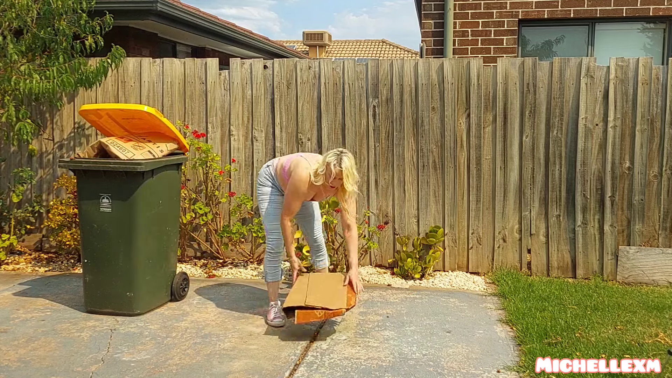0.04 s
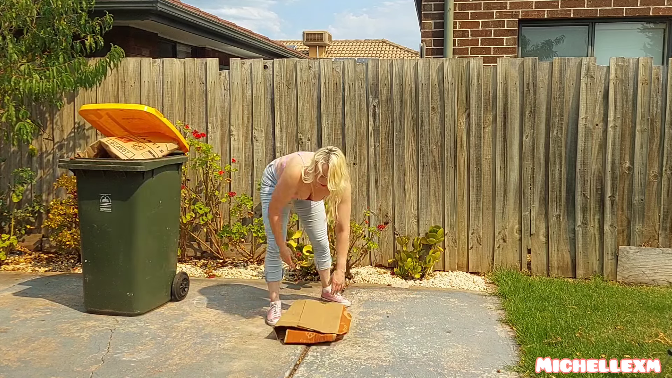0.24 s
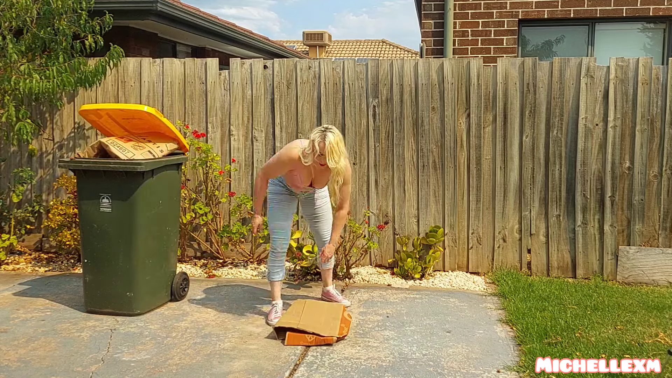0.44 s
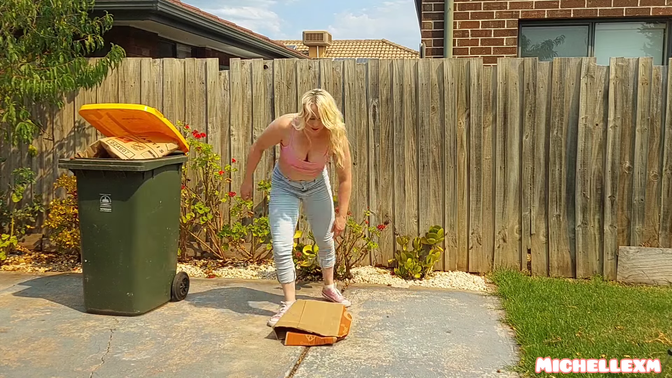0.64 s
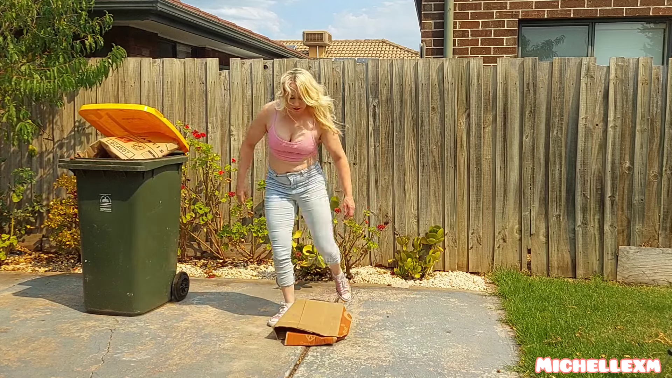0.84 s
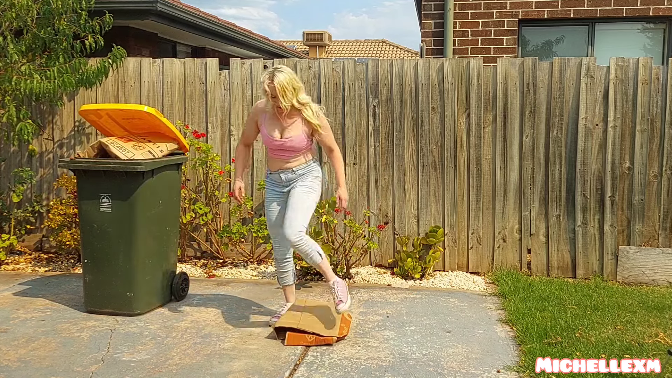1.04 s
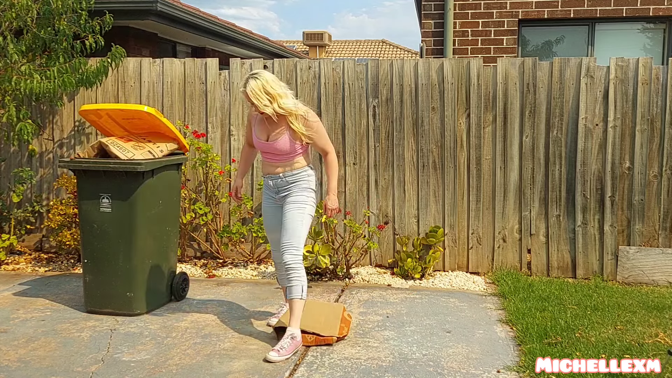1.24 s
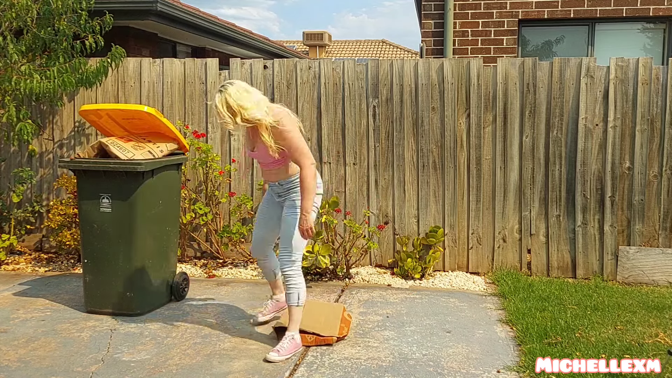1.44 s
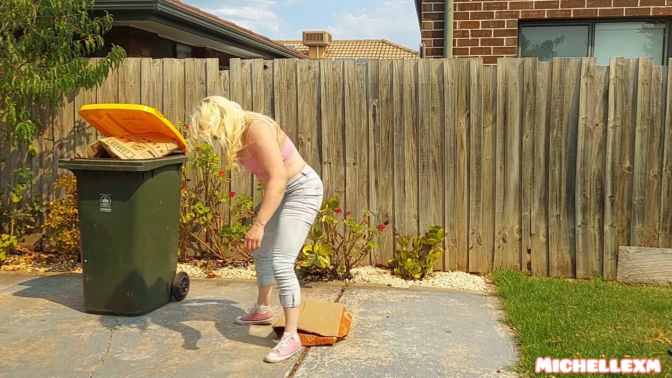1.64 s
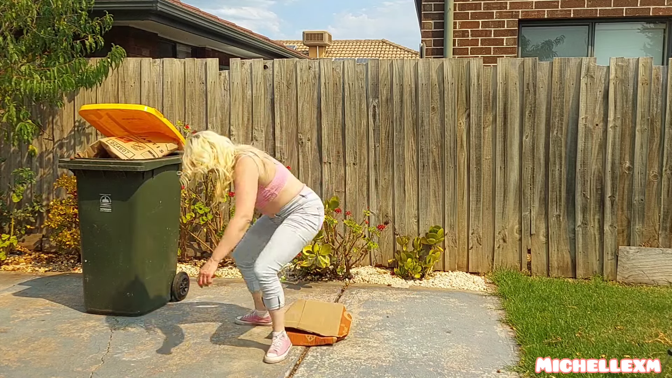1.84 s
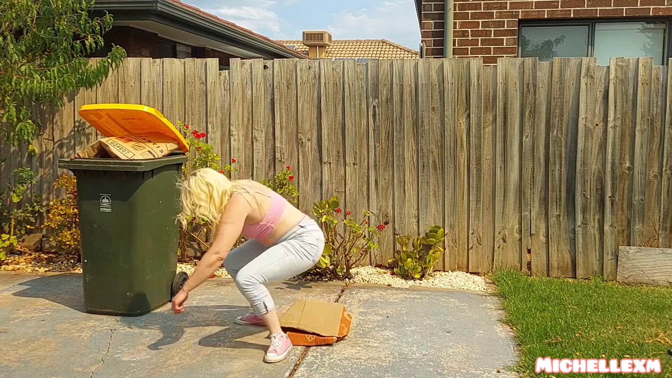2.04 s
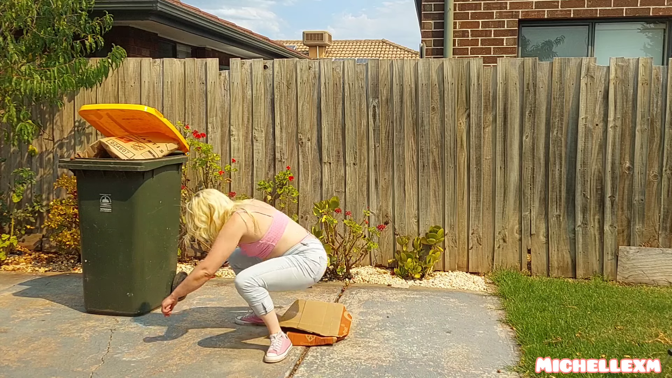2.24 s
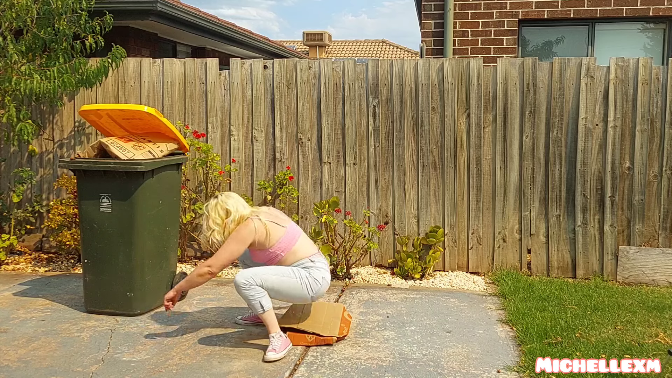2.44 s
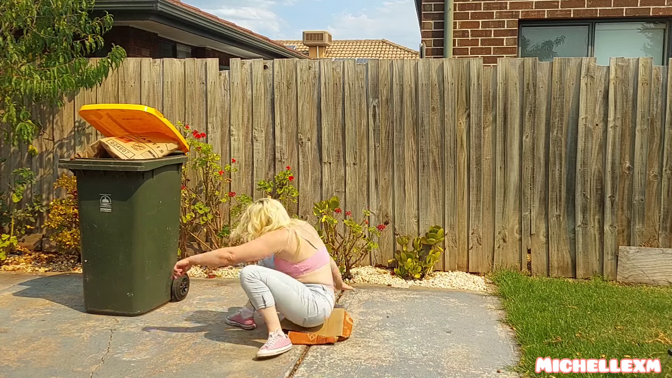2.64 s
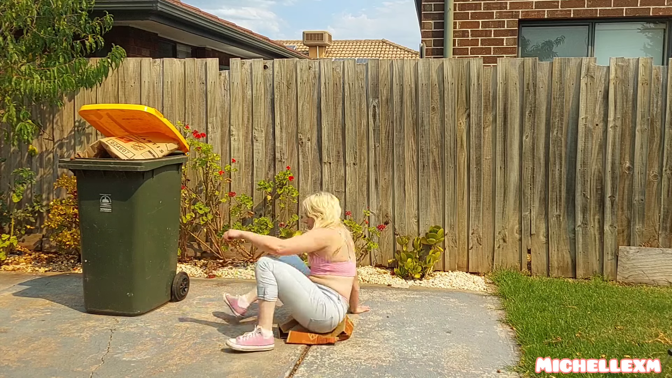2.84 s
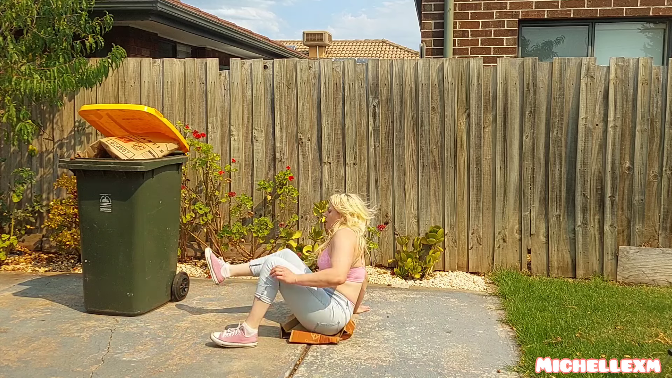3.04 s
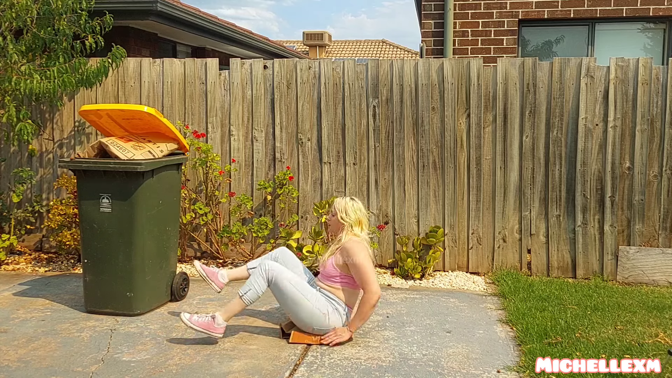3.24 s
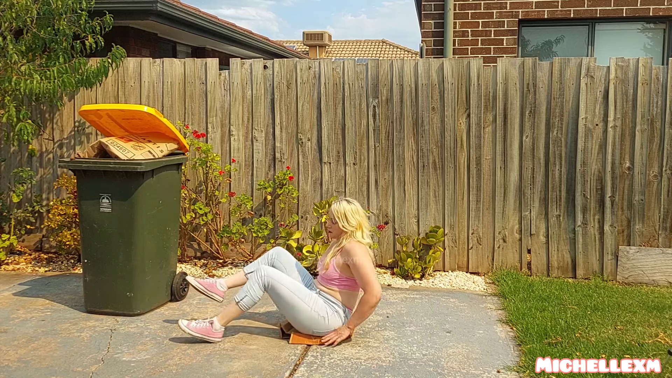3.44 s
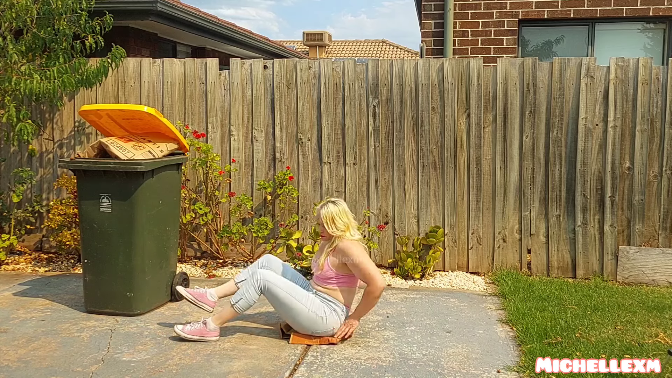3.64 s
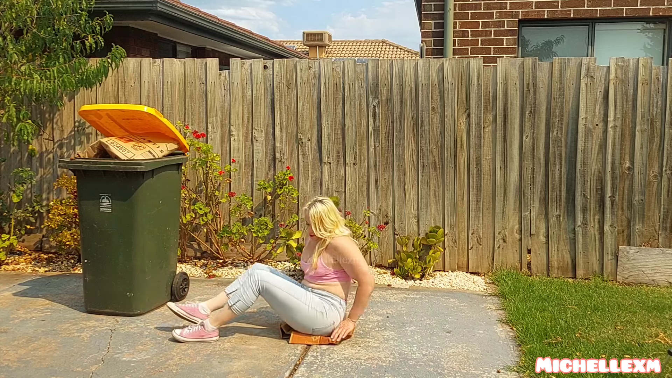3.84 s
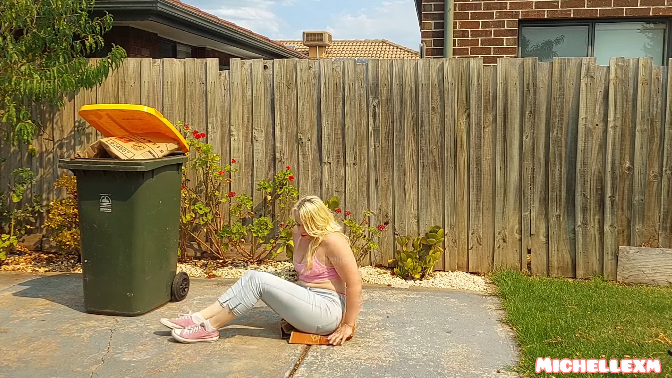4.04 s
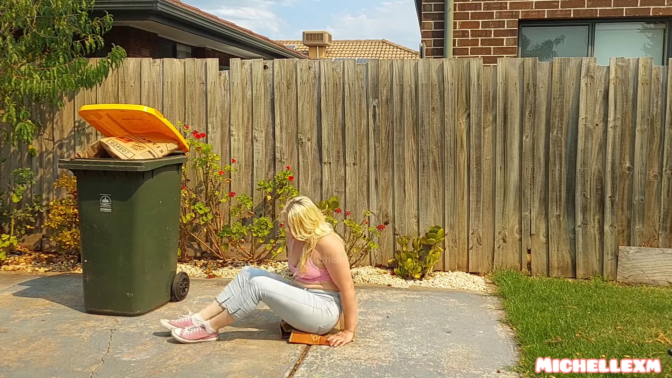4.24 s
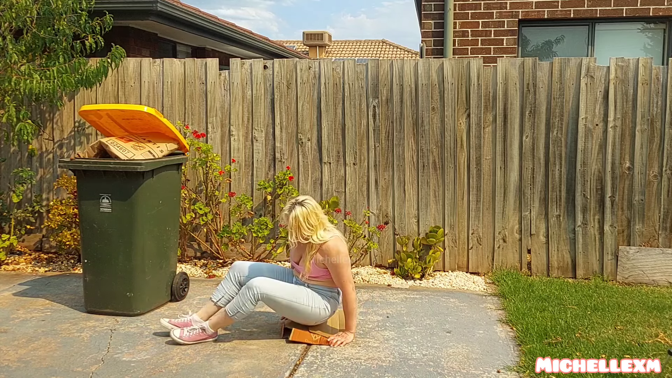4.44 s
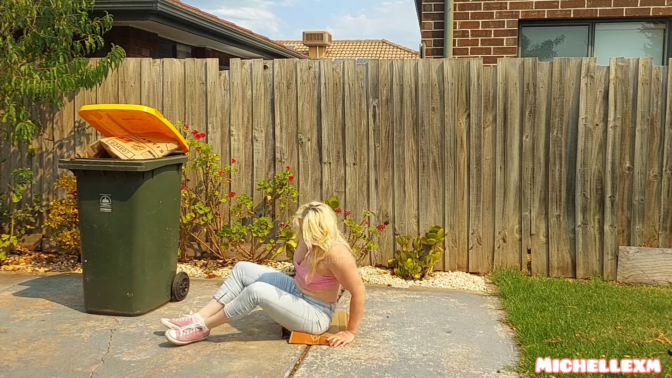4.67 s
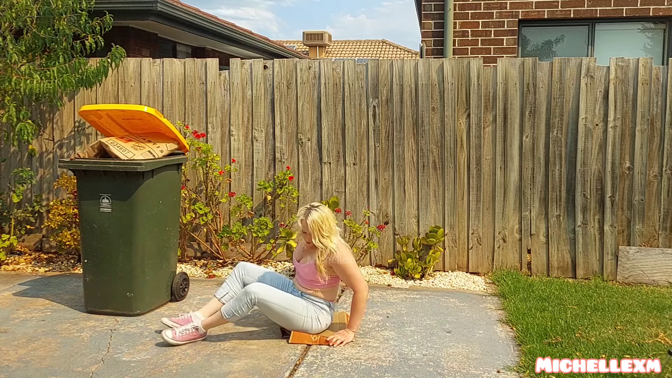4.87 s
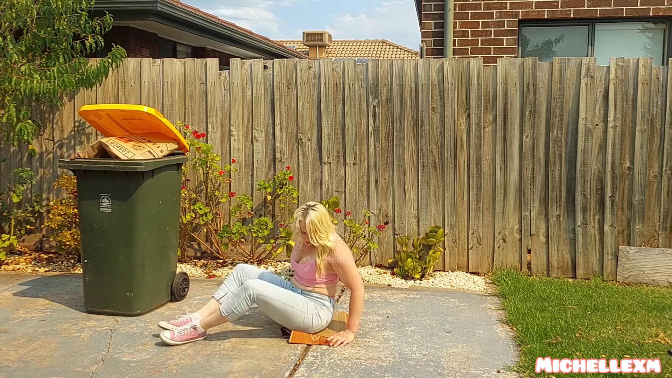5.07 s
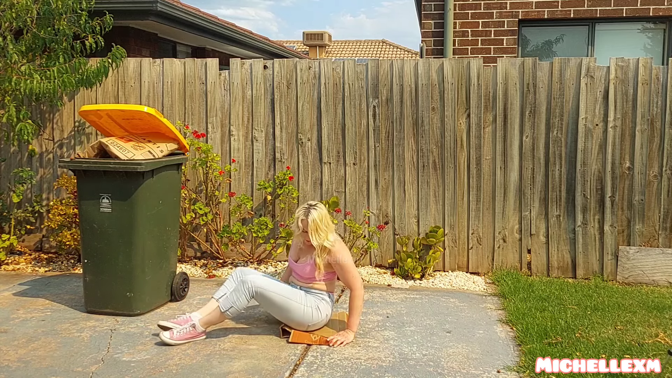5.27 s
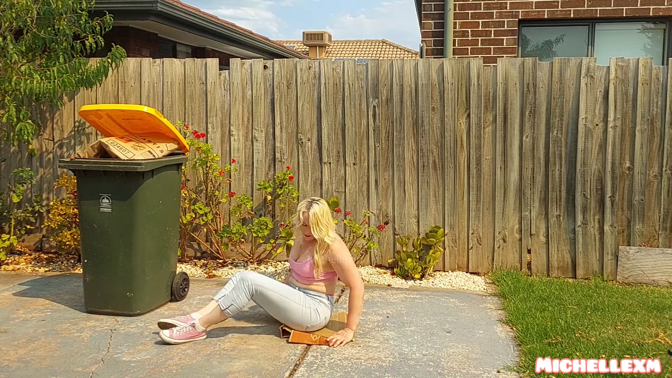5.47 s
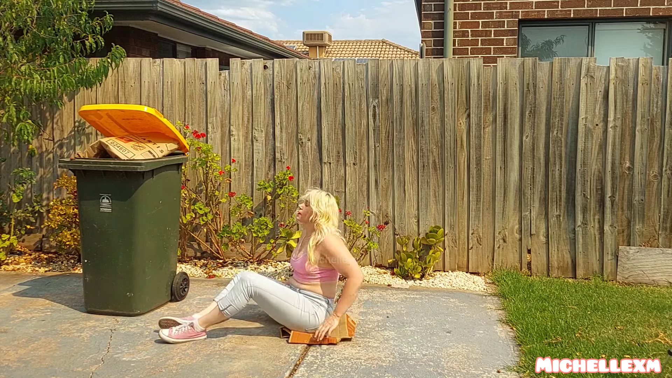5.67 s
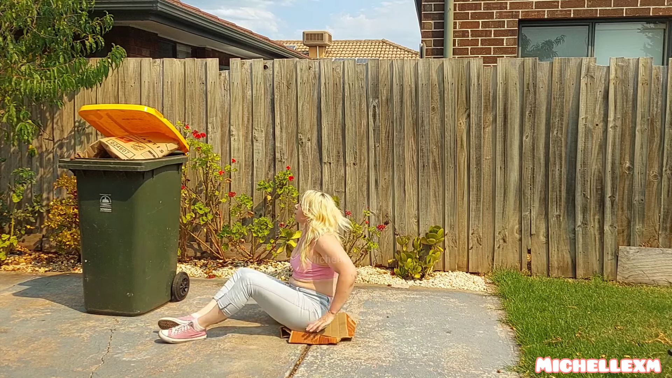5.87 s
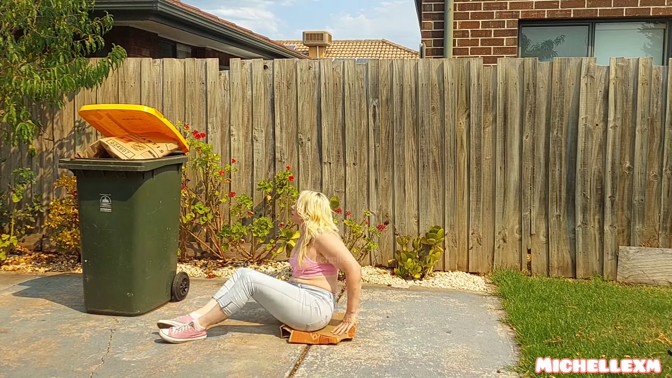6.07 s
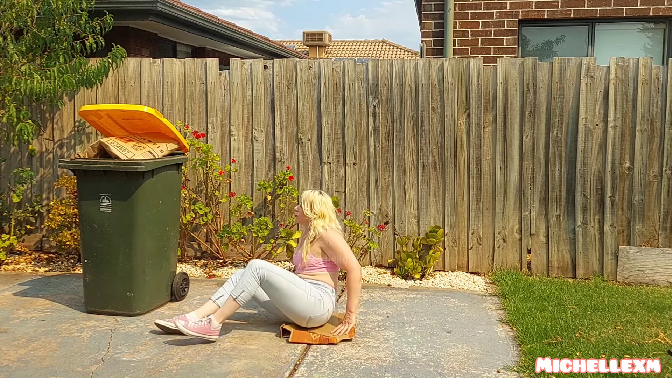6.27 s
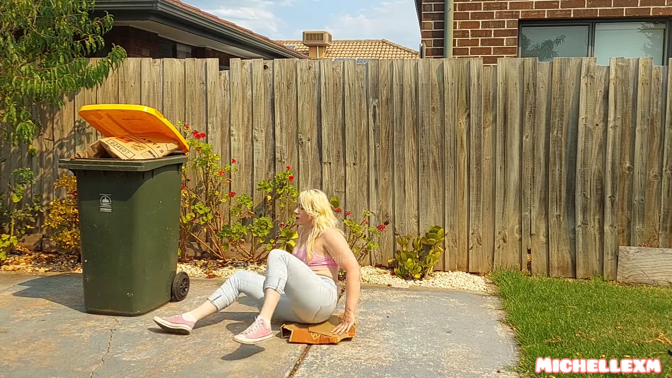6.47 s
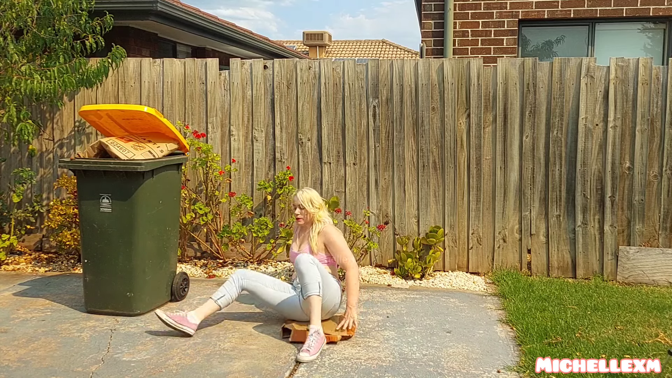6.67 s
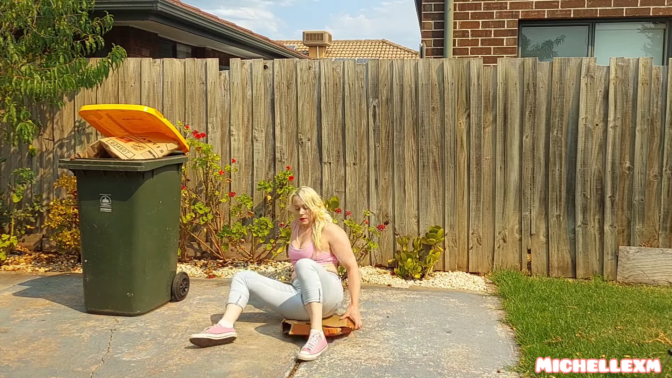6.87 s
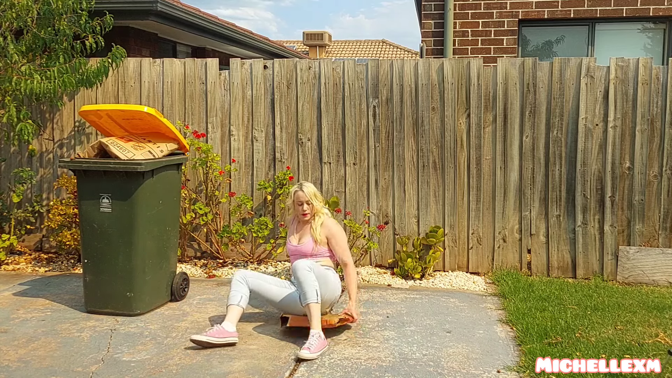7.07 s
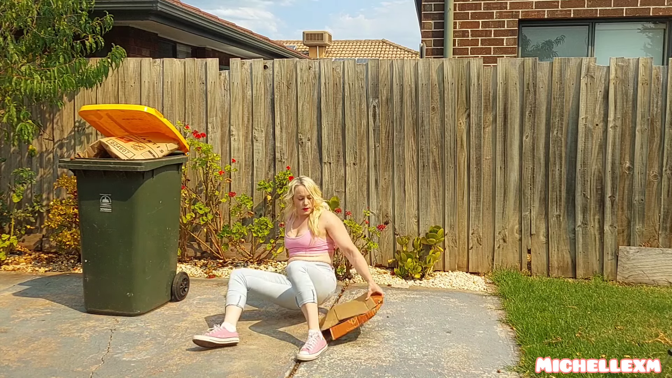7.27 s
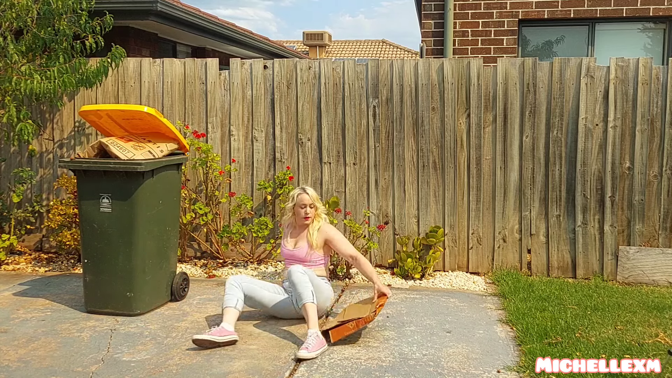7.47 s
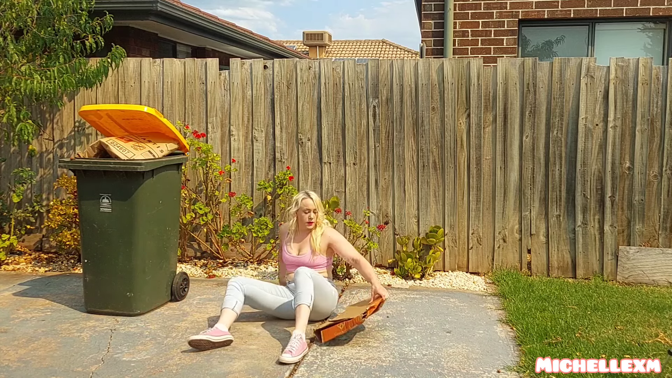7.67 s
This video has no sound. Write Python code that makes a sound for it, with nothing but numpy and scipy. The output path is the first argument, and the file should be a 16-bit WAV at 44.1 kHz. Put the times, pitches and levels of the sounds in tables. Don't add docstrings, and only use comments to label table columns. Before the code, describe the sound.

A cardboard box smacks onto concrete, then creaks, snaps and thumps hollowly as someone sits and shuffles on it, over a faint distant machine rumble.

```python
import sys
import numpy as np
from scipy import signal
from scipy.fft import rfft, irfft
from scipy.io import wavfile
from scipy.ndimage import uniform_filter1d

SR = 44100
rng = np.random.default_rng(int(sys.argv[2]) if len(sys.argv) > 2 else 0)


def put_to_file(sound):
    columns = np.atleast_2d(sound).T
    safe = np.clip(columns, -1, 1)
    whole_steps = np.round(safe * 32767)
    wavfile.write(sys.argv[1], SR, whole_steps.astype(np.int16))


def to_linear_factor(level_db):
    exponent = np.asarray(level_db, float) / 20
    return 10 ** exponent


N = 340011

# (frequency [Hz], density [dB per Hz])
RUSTLE = [(5000, -30), (7500, -15), (9200, -18), (10200, -4), (11400, 0), (13000, -2.5), (15000, -7),
          (16500, -10)]
# (frequency [Hz], density [dB per Hz])
GRIT = [(1800, -25.5), (3000, -5), (3900, -5), (5100, -5), (5800, -10.5), (8000, -10), (10000, -18.5)]


def cracks():
    # (time [s], snap peak [dB], thump re snap [dB], fizz re snap [dB], snap ring [Hz])
    creases = [(0.161, -34, -4, -10, 700), (0.2031, -23.5, 8, 9, 1100), (0.214, -31.5, 16, -14, 1180),
               (0.2247, -11.5, -14, 2, 1050), (0.2352, -26, 11.5, -43, 1040), (2.6337, -36, 12, -15, 902),
               (2.643, -21, 3, -17, 1390), (2.6974, -43, -15, -15, 1380), (2.7341, -34, -3, -29, 1300),
               (2.9347, -45, -29, 17, 1210), (4.3475, -26.5, 6, -25, 1010), (4.3573, -30.5, 4, -13, 1100),
               (4.6998, -37, -4, -7, 902), (4.732, -20.5, 0, 12, 1210), (4.7466, -19, -17, -30, 1700),
               (6.706, -33.5, -2, -17, 2420), (7.295, -29.5, -3, -20.5, 990)]
    # (time [s], snap peak [dB], fizz re snap [dB], snap ring [Hz])
    fibres = [(0.5494, -85, -24, 2560), (1.8093, -47, 12, 2570), (1.8577, -51, 16, 2510),
              (3.409, -43, -15, 1800), (3.893, -40, -24, 4440), (4.14, -40, -8, 2500),
              (4.1935, -27.5, 11.5, 2870), (4.246, -53, 1, 3400), (4.4393, -64, 30, 2630),
              (4.995, -67, 28, 3000), (5.153, -64, 24, 3000), (5.5013, -44.5, 17, 3200),
              (5.5892, -39, 9, 4500), (6.0447, -62, 1, 2660), (7.0477, -36, -30, 1530),
              (7.147, -56, -10, 1910)]
    crease_t60_s, fibre_t60_s, fibre_thump_db = 0.044, 0.014, -12
    events = [(*row, crease_t60_s) for row in creases]
    events += [(s, db, fibre_thump_db, fizz_db, hz, fibre_t60_s) for s, db, fizz_db, hz in fibres]
    t, out = np.arange(4410) / SR, np.zeros(N)
    for s, db, thump_db, fizz_db, hz, t60_s in events:
        burst = 0.066 * rng.standard_normal(len(t)) * to_linear_factor(-60 * t / t60_s)
        burst[0] += 1
        snap = resonate_twice(burst, hz, 1.36 * hz) + 0.022 * colour(burst, GRIT)
        thump, fizz = panels(burst), colour(burst, RUSTLE)
        sound = to_linear_factor(db) * snap / abs(snap).max()
        sound += to_linear_factor(db + thump_db - 7.5) * thump / abs(thump).max()
        sound += to_linear_factor(db + fizz_db - 12) * fizz / abs(fizz).max()
        part = out[round((s + .0011) * SR):][:len(t)]
        part += sound[:len(part)]
    return out


def knocks():
    # (time [s], peak [dB], frequency [Hz], t60 [ms])
    hits = [(0.2079, -15.5, 191, 49), (.2095, -16, 567, 30), (0.2168, -13, 380, 51),
            (0.2203, -18.5, 209, 92), (.2265, -15.5, 790, 36), (.2315, -16, 565, 27),
            (0.2361, -24, 303, 27), (.374, -34, 780, 25), (2.696, -17, 330, 30), (2.7355, -15, 256, 45),
            (2.934, -31, 1050, 19), (1.269, -36, 600, 28), (1.270, -43, 1600, 9), (1.310, -41, 800, 25),
            (1.658, -34, 620, 20), (1.658, -38, 1500, 7), (2.614, -30, 407, 60), (2.622, -24, 410, 50),
            (2.631, -15, 254, 45), (2.638, -21, 500, 50), (2.772, -34, 217, 44), (2.930, -37, 257, 34),
            (3.272, -45, 1700, 14), (3.285, -48, 3100, 9.6), (3.755, -47, 2510, 14),
            (4.347, -25.5, 447, 39), (4.355, -35, 353, 31), (4.72, -24.5, 298, 38), (4.7316, -19, 1317, 13),
            (4.741, -23, 1190, 27), (5.262, -42, 2050, 10), (5.263, -46, 2500, 8.6), (5.501, -48, 1090, 16),
            (5.589, -30.5, 1500, 5.2), (5.589, -47.5, 5100, 5.8), (6.473, -42, 606, 19),
            (6.706, -27, 640, 22), (6.708, -35, 2460, 6), (7.206, -29, 1110, 23), (7.237, -37, 396, 38),
            (7.263, -22.5, 980, 21), (7.264, -41, 2300, 8), (7.292, -35, 437, 40), (7.317, -32, 300, 35),
            (7.438, -40, 304, 32)]
    rise_turns = 0.1
    t, out = np.arange(4410) / SR, np.zeros(N)
    for s, db, hz, t60_ms in hits:
        rise = 1 - np.exp(-t * hz / rise_turns)
        decay = to_linear_factor(-6e4 * t / np.clip(t60_ms, 3, 2e4 / hz))
        ring = rise * decay * np.sin(2 * np.pi * hz * t)
        out[round(s * SR):][:len(t)] += to_linear_factor(db) * ring / abs(ring).max()
    return out


def handling(snaps, thuds):
    # (frequency [Hz], density [dB per Hz])
    scrape_spectrum = [(500, -24.5), (1100, 0), (1500, 1), (2100, -1.5), (2700, -7.5), (3300, -8.5),
                       (6000, -48.5)]
    flex_db, scrape_db, grit_db, rustle_db, stiff_db = efforts()
    drag = slips(per_s=1800, spread_db=3.0, clump_db=1.0, hiss=1.6)
    creak = slips(per_s=600, spread_db=2.5, clump_db=1.2, hiss=.8)
    fibres = slips(per_s=3000, spread_db=2.5, clump_db=1.1, hiss=1.5)
    flex = to_linear_factor(flex_db + 3.5) * steady(panels(creak, stiff_db), 900, .8)
    scrape = to_linear_factor(scrape_db + 0.5) * evened(colour(drag, scrape_spectrum))
    grit = to_linear_factor(grit_db + 4.0) * evened(colour(drag, GRIT))
    rustle = to_linear_factor(rustle_db + .7) * evened(colour(fibres, RUSTLE))
    return ducked(flex, snaps + thuds) + ducked(scrape + grit, snaps) + rustle


def efforts():
    # (peak time [s], flexing [dB], scraping re flexing [dB], rise [ms per 10 dB], fall [ms per 10 dB])
    presses = [(0.162, -32, -8.5, -2, 78), (0.206, -19.5, -3, 2.5, 27), (.229, -18, -12, 17, 4),
               (.262, -37, -19, 17, 33), (.352, -54, -16, 66, 195), (2.627, -21.5, -23, -5, 33),
               (2.645, -27, 5, 6, 11), (2.702, -32, -8, 44.5, 67), (2.734, -25, -7, 10, 8),
               (2.802, -54, 3, 40, 47), (2.972, -42.5, -2, 38, 40), (3.102, -63, 3.5, 102, 260),
               (3.502, -49.5, -8.5, 158, 150), (3.762, -51, -14.5, 75, 67), (4.062, -58.5, 8, 75, 103),
               (4.132, -45.5, 0.5, 38, 35), (4.349, -26, -7, 5.5, 18.5), (4.703, -37.5, -10, 28, 52),
               (4.735, -27, -1, 8.5, 22.5), (5.252, -67.5, -2, 80, 200), (6.709, -33, -7.5, 4, 13),
               (7.172, -52, 1, 36, 100), (7.246, -35, -10.5, 55, 60), (7.31, -35.5, -8, 38, 26),
               (7.432, -42.5, -16, 37, 175)]
    # (peak time [s],
    # rustle [dB], grit re rustle [dB], rise [ms per 10 dB], fall [ms per 10 dB])
    rubbings = [(.092, -59, -9, 127, 67), (.165, -43, 0.5, 4.5, 13), (.226, -48, 2.5, 16, 38),
                (.362, -65.5, 3.5, 97, 156), (.602, -93, 14, 150, 300), (.822, -75, 6.5, 44, 116),
                (1.002, -96, 10.5, 150, 300), (1.242, -71, -1.5, 52, 105), (1.362, -65, -2.5, 85, 155),
                (1.652, -85, 12, 200, 200), (1.852, -68.5, 1, 47, 42), (2.052, -86.5, 9, 253, 68),
                (2.592, -82, 0, 40, 45),
                (2.662, -43, -2, 23, 70), (2.802, -55.5, -2, 39, 100), (2.97, -45, -5, 44, 24.8),
              (3.102, -66.5, 0, 450, 250), (3.562, -58.5, -9.5, 125, 70), (3.752, -64.5, -2.5, 140, 60.4),
              (3.922, -62, -2, 66, 100), (4.052, -57.5, 0.5, 81, 100), (4.142, -52, -5, 100, 30),
              (4.201, -51.5, -5, 32, 50), (4.345, -51.5, -0.5, 63, 50.7), (4.482, -64, -1.5, 210, 150),
              (4.702, -55, -3, 25, 30), (4.739, -46, 2, 10, 61), (5.282, -68, 2.5, 166, 164),
              (5.385, -61.5, -6, 31, 40), (5.501, -61, -3, 3.5, 84), (5.852, -90.5, 16, 1100, 201),
              (6.055, -57.5, -10.5, 7.4, 59.6), (6.682, -58.5, -6, 305, 63), (6.922, -62, -3.5, 140, 50),
              (7.052, -62.5, .4, 130, 80), (7.172, -51.5, -5.5, 23, 100), (7.235, -48.5, -2, 52, 30),
              (7.282, -48.5, -6, 88, 250)]
    rest_flex_db, rest_scrape_db, rest_grit_db, rest_rustle_db = -57.5, -86, -100, -92
    rub_scrape_db = 7
    rubs = rubbings
    scrapes = [(s, db + rel, *shape) for s, db, rel, *shape in presses]
    scrapes += [(s, db + rel + rub_scrape_db, *shape) for s, db, rel, *shape in rubs]
    flex_db = swells([(s, db, *shape) for s, db, rel, *shape in presses], rest_flex_db)
    scrape_db = swells(scrapes, rest_scrape_db)
    grit_db = swells([(s, db + rel, *shape) for s, db, rel, *shape in rubs], rest_grit_db)
    rustle_db = swells([(s, db, *shape) for s, db, rel, *shape in rubs], rest_rustle_db)
    stiff_db = 0.5 + 0.35 * (scrape_db - flex_db) + 0.12 * (flex_db - rest_flex_db)
    return flex_db, scrape_db, grit_db, rustle_db, stiff_db


def panels(x, stiff_db=0):
    # (frequency [Hz], width [Hz], level [dB])
    modes = [(107, 19, -2.5), (235.8, 35, 1), (325, 103, -2.5), (403, 62, 1), (655, 310, 1.5),
             (798, 240, 2.5), (1020, 450, -5)]
    out = 0
    for k, (hz, width, db) in enumerate(modes):
        gain = (-1) ** k * to_linear_factor(db + stiff_db * np.log2(hz / 450)) / np.sqrt(width)
        out = out + gain * resonate(x, hz, width)
    return out


def slips(per_s, spread_db, clump_db, hiss):
    sizes = to_linear_factor(spread_db * np.minimum(rng.exponential(1, N), 5))
    clicks = sizes * (rng.random(N) < per_s / SR) * rng.standard_normal(N)
    mix = evened(clicks) + hiss * rng.standard_normal(N)
    return mix * to_linear_factor(clump_db * wander(24))


def ducked(board, snaps):
    board_power = uniform_filter1d(board ** 2, size=500) + 1e-12
    snap_power = uniform_filter1d(snaps ** 2, size=500) + 1e-12
    return board * board_power / (board_power + 3 * snap_power)


def chafes():
    # (time [s], length [s], level [dB], frequency [Hz], width [Hz])
    edge_rubs = [(3.225, 0.016, -60, 4700, 710), (4.009, 0.1, -49, 2300, 1300),
                 (4.079, 0.047, -50, 2500, 1600), (7.134, 0.085, -51, 1970, 700),
                 (7.336, .06, -58, 2040, 500), (6.547, 0.15, -66, 2570, 700),
                 (5.265, 0.014, -58, 4130, 900), (7.297, 0.021, -42, 5030, 1200),
                 (7.335, 0.007, -54, 5000, 700), (7.404, 0.045, -48.5, 5470, 2500),
                 (7.405, 0.046, -47.5, 1990, 900)]
    out = np.zeros(N)
    for s, length_s, db, hz, width in edge_rubs:
        rub = rng.standard_normal(round(length_s * SR))
        part = out[round(s * SR):][:len(rub)]
        part += to_linear_factor(db) * evened(resonate_twice(rub, hz, width)) * np.hanning(len(rub))
    return out


def spread(x, loose):
    # (frequency [Hz], left-right likeness [0-1])
    likeness = [(60, .97), (380, .94), (1300, .72), (2200, .8), (4200, .4), (5300, .6), (7000, .35),
                (9300, .5), (15000, .15)]
    # (frequency [Hz], phase [rad])
    phase_lead = [(250, 0), (950, .55), (2410, .1), (4310, 1.1), (5510, .3), (8300, 3.2), (10500, 2.9),
                  (12000, 1.5)]
    hz, _, z = signal.stft(x, SR, nperseg=128)
    same = np.clip(read(likeness, hz), .01, 1)[:, None] ** loose
    lead = read(phase_lead, hz)[:, None]
    other = abs(z) * np.exp(2j * np.pi * rng.random(z.shape))
    right = same * z * np.exp(-1j * lead) + 1.56 * np.sqrt(1 - same ** 2) * other
    return np.array([x, signal.istft(right, SR, nperseg=128)[1][:N]])


def echoes(x):
    # (frequency [Hz], t60 [s])
    decay_t60 = [(200, 0.13), (1000, 0.11), (4000, 0.14), (12000, 0.086)]
    taps = np.zeros((2, SR // 2))
    at = np.arange(200, SR // 2 - 20, 20) + rng.integers(0, 20, (2, (SR // 2 - 201) // 20))
    np.put_along_axis(taps, at, rng.choice([-1., 1.], at.shape), 1)
    hz, t, z = signal.stft(taps, SR, nperseg=256)
    tail = signal.istft(z * to_linear_factor(-60 * t / read(decay_t60, hz)[:, None]), SR, nperseg=256)[1]
    return signal.fftconvolve(x, tail / np.linalg.norm(tail[0]), axes=1)[:, :N]


def drones():
    # (time [s], level [dB])
    surges = [(.22, -37.5), (.6, -41), (1.57, -35.5), (1.95, -37.5), (2.25, -40), (2.73, -38), (3.53, -37),
              (3.96, -33.5), (4.2, -38), (4.45, -35), (4.8, -42), (5.52, -38), (5.88, -39), (6.15, -40),
              (6.43, -35.5), (7.48, -36)]
    # (time [s], level [dB])
    throbs = [(.11, -40), (.6, -43), (.8, -46), (1.45, -45), (1.8, -38), (2.06, -39), (2.45, -46),
              (2.72, -46), (3.45, -40.5), (3.75, -34), (4.05, -37), (4.42, -36.5), (4.7, -39.5),
              (5.07, -34), (5.4, -41.5), (5.59, -42), (5.82, -41), (6.1, -40.5), (6.5, -42), (6.92, -45),
              (7.25, -53), (7.45, -40.5)]
    # (frequency [Hz], width [Hz], level [dB])
    whines = [(40.7, 6.7, -55), (227.2, 2.1, -52), (284.2, 6.2, -62)]
    surge_ms, throb_ms = 122, 100
    idle_rumble_db, idle_drone_db = -67, -48
    rumble_db = swells([(s, db, surge_ms, surge_ms) for s, db in surges], idle_rumble_db)
    drone_db = swells([(s, db, throb_ms, throb_ms) for s, db in throbs], idle_drone_db)
    rumble = steady(fuzzy(hz=93.7, width=51.6), 3000, .45)
    drone = steady(fuzzy(hz=143.67, width=12.8), 3000, .45)
    out = to_linear_factor(rumble_db - 0.5) * rumble + to_linear_factor(drone_db + 1.0) * drone
    for hz, width, db in whines:
        out += to_linear_factor(db) * fuzzy(hz, width)
    return out


def yard():
    # (frequency [Hz], level [dB])
    wash_spectrum = [(31, -33), (41, -28), (86, -2.5), (145, -1.5), (235, -13.5), (310, -20.5),
                     (512, -18.5), (700, -23), (2300, -42.5), (2900, -55), (6000, -68), (8000, -60.5),
                     (11300, -64), (12200, -77), (16000, -71)]
    # (frequency [Hz], left-right likeness [-1 to 1])
    likeness = [(60, .96), (200, .9), (380, .65), (700, 0), (1300, -.3), (2400, 0), (4400, -.2), (8000, 0)]
    frame_count, hz = N // 512 + 5, np.fft.rfftfreq(2048, 1 / SR)
    a, b, c, d, patches = rng.standard_normal((frame_count, 1025, 5)).T
    patches = uniform_filter1d(patches, size=20, axis=0)
    patches = evened(uniform_filter1d(patches, size=8, axis=1))
    same = np.clip(read(likeness, hz), -1, 1)[:, None]
    left, other = a + 1j * b, c + 1j * d
    z = np.array([left, same * left + np.sqrt(1 - same ** 2) * other])
    thin_db = -7 * np.exp(-((hz - 115) / 60) ** 2)
    z *= to_linear_factor((read(wash_spectrum, hz) + thin_db)[:, None] + 1.04 * patches)
    return to_linear_factor(-42) * evened(signal.istft(z, nperseg=2048, noverlap=1536)[1][:, :N])


def birds():
    # (time [s], level [dB])
    twitter = [(0, -82), (.9, -78), (1.5, -78), (1.9, -82), (2.3, -80), (3.2, -76.5), (4.3, -78.5),
               (5.1, -76), (6.3, -78), (6.8, -83), (7.71, -77)]
    s, db = np.transpose(twitter)
    level_db = np.interp(np.arange(N) / SR, s, db)
    out = np.zeros((2, N))
    for hz, side in [(7780, 0), (8080, 0.98)]:
        whistle = np.sin(2 * np.pi * np.cumsum(hz + 150 * wander(45)) / SR)
        chirps = np.clip(wander(16) + .3, 0, 1) * to_linear_factor(4 * wander(120))
        out += to_linear_factor(level_db) * whistle * chirps * np.roll([[1], [.4]], side)
    return out


def evened(x):
    return x / np.sqrt(np.mean(x ** 2) + 1e-20)


def read(points, hz):
    f, value = np.transpose(points)
    return np.interp(np.log(hz + 1), np.log(f + 1), value)


def colour(x, points):
    gain_db = np.maximum(read(points, abs(np.fft.fftfreq(8192, 1 / SR))), -90)
    log_gain = np.log(to_linear_factor(gain_db))
    taps = np.fft.ifft(np.exp(log_gain - 1j * signal.hilbert(log_gain).imag)).real[:2048]
    return signal.oaconvolve(x, taps / np.linalg.norm(taps))[:len(x)]


def resonate(x, hz, width):
    turn = np.exp(2j * np.pi * np.cumsum(hz * np.ones(len(x))) / SR)
    r = np.exp(-np.pi * width / SR)
    return 2 * (turn * signal.lfilter([1 - r], [1, -r], x / turn)).real


def resonate_twice(x, hz, width):
    return resonate(resonate(x, hz, width), hz, width)


def fuzzy(hz, width):
    return evened(resonate_twice(rng.standard_normal(N), hz, width))


def wander(per_s):
    steps = rng.standard_normal(N // 64 + 2)
    smooth = signal.sosfiltfilt(signal.butter(2, per_s, fs=SR / 64, output="sos"), steps)
    return np.interp(np.arange(N) / 64, np.arange(len(steps)), evened(smooth))


def steady(x, span, firm):
    return evened(x / (uniform_filter1d(abs(x), size=span) + 1e-12) ** firm)


def swells(rows, rest_db):
    t = np.arange(0, N + 32, 32) / SR
    s, db, rise_ms, fall_ms = np.transpose(rows)[..., None]
    slope_db = -1e4 * abs(t - s) / np.maximum(np.where(t < s, rise_ms, fall_ms), 1)
    total_db = 10 * np.log10((to_linear_factor(db + slope_db) ** 2).sum(0) + to_linear_factor(rest_db) ** 2)
    return np.interp(np.arange(N) / SR, t, total_db)


def scene():
    snaps, thuds = to_linear_factor(5) * cracks(), knocks()
    board = handling(snaps, thuds) + chafes()
    box = spread(snaps, 0.84) + spread(thuds, 0.48) + spread(board, 1.0)
    reflected = to_linear_factor(-8.0) * echoes((snaps + thuds + board)[None])
    return box + reflected + drones() + yard() + birds()


def band_limit(x):
    return signal.sosfilt(signal.butter(12, 16820, fs=SR, output="sos"), x)


def record(dry):
    # (frequency [Hz], left re right [dB])
    balance = [(60, -1.5), (700, -1), (2400, 1.1), (7000, 2), (8000, -5.5), (10200, 15), (12000, -1),
               (16000, 2)]
    hz = np.fft.rfftfreq(N, 1 / SR)
    lean_db = read(balance, hz) / 2
    bass_cut_db = -10 * np.log10(1 + (38 / (hz + 1)) ** 14)
    edge_db = bass_cut_db - 30 * (hz > 15850)
    mix = irfft(rfft(dry) * to_linear_factor([edge_db + lean_db, edge_db - lean_db]), N)
    return band_limit(mix)


dry = scene()
out = record(dry)
put_to_file(out)
```